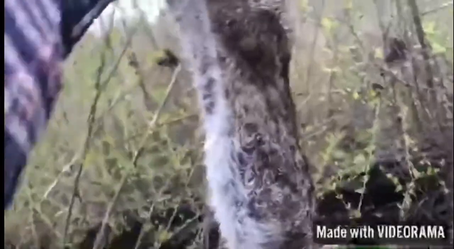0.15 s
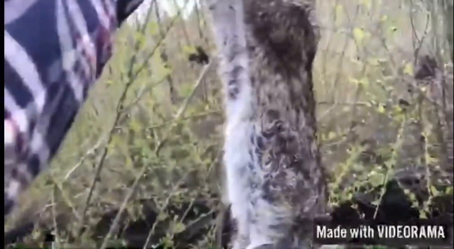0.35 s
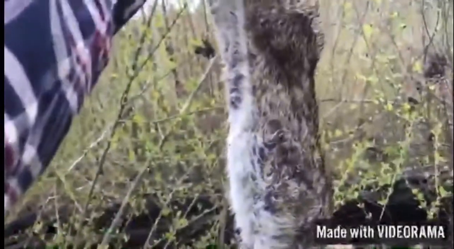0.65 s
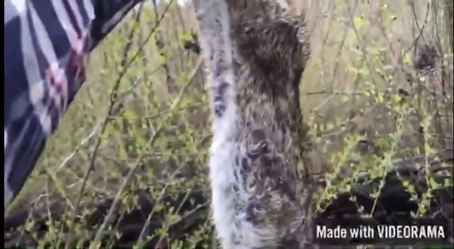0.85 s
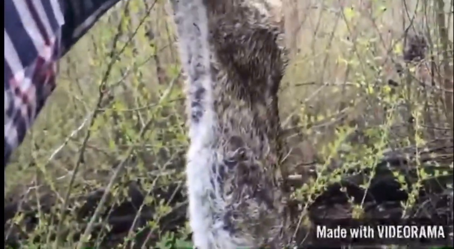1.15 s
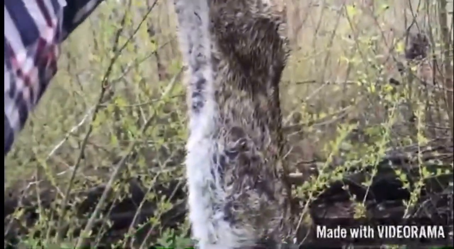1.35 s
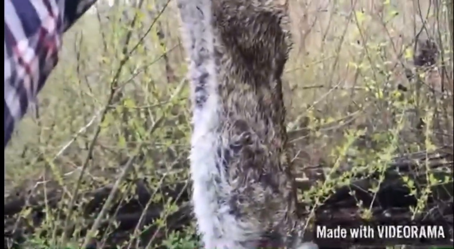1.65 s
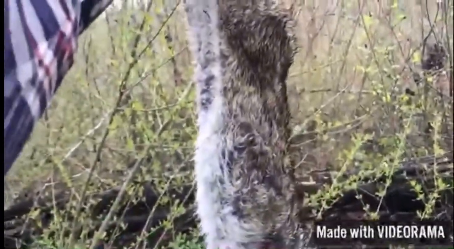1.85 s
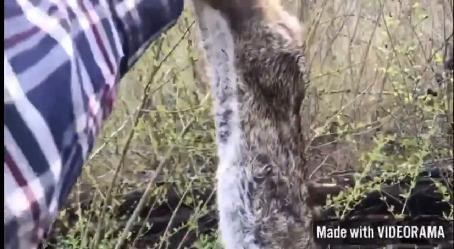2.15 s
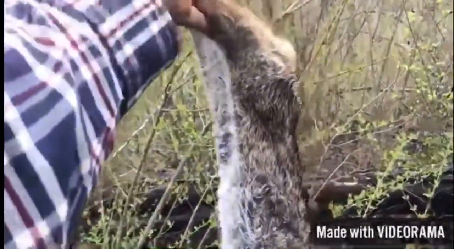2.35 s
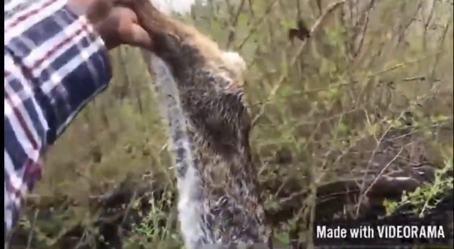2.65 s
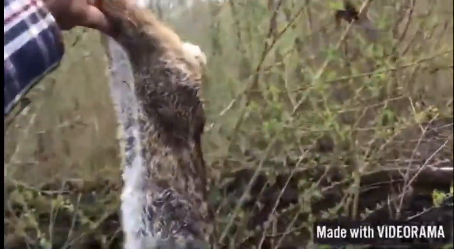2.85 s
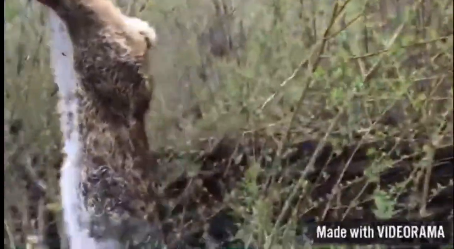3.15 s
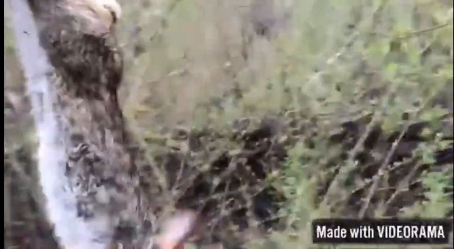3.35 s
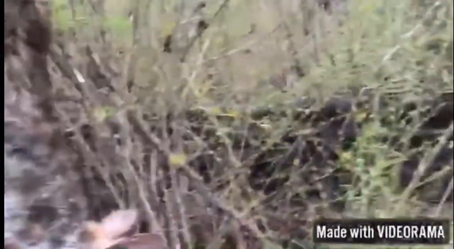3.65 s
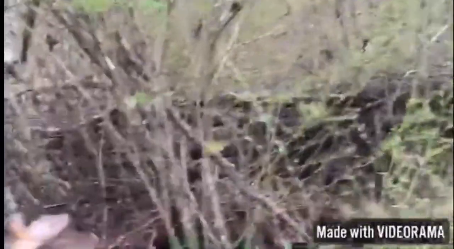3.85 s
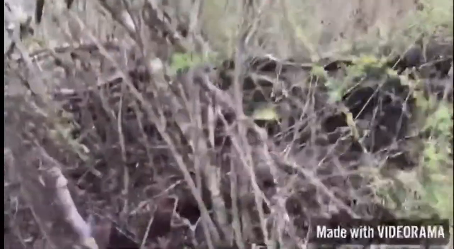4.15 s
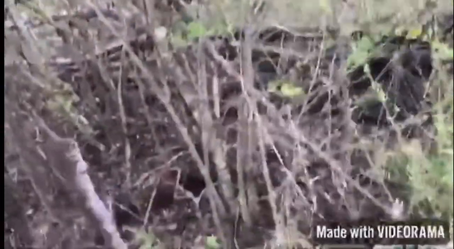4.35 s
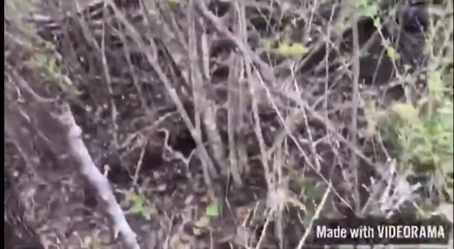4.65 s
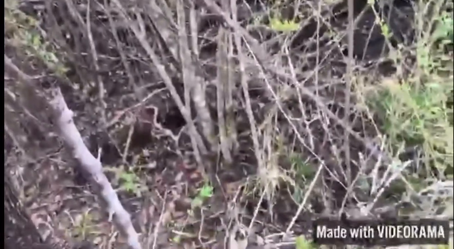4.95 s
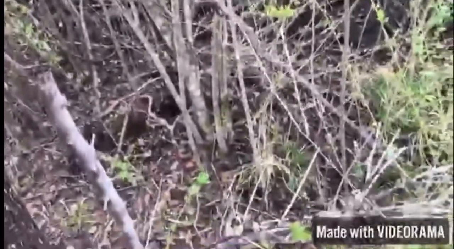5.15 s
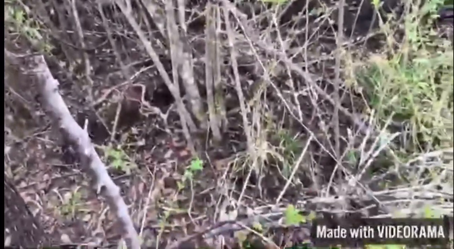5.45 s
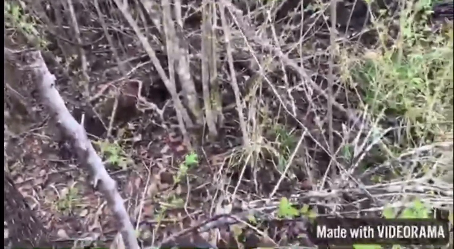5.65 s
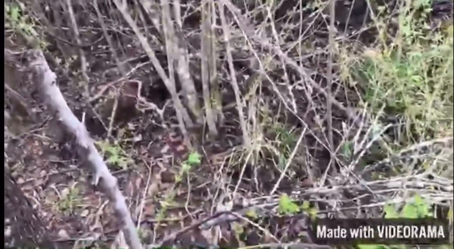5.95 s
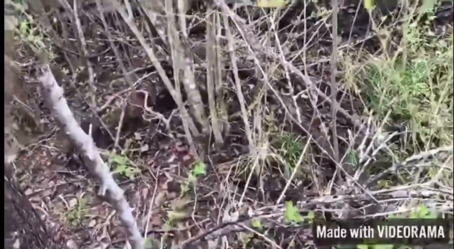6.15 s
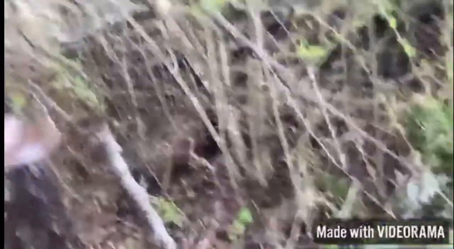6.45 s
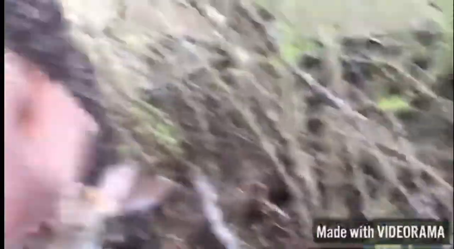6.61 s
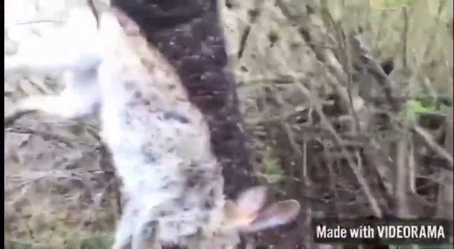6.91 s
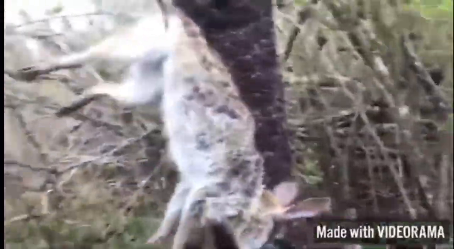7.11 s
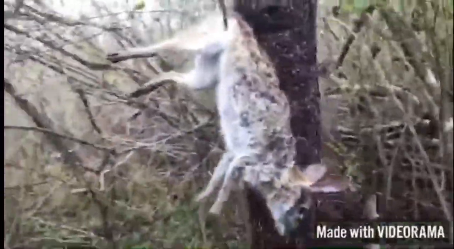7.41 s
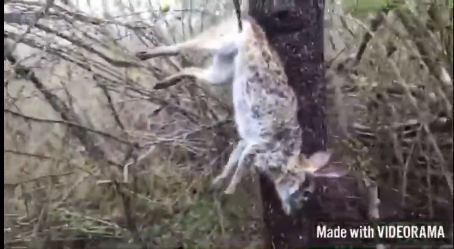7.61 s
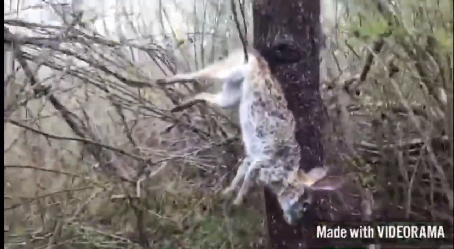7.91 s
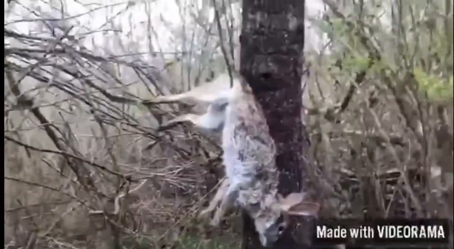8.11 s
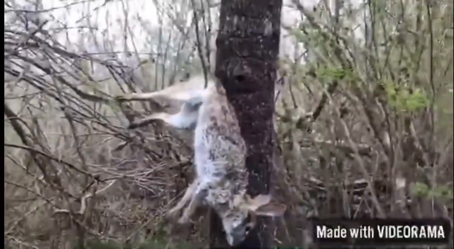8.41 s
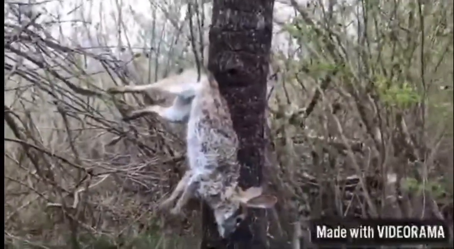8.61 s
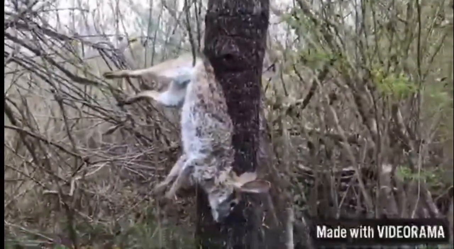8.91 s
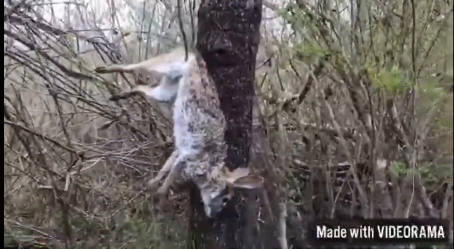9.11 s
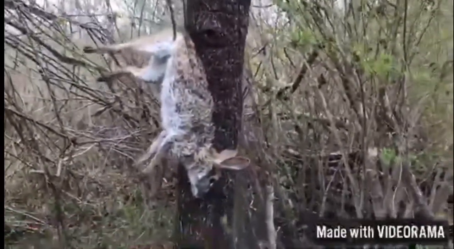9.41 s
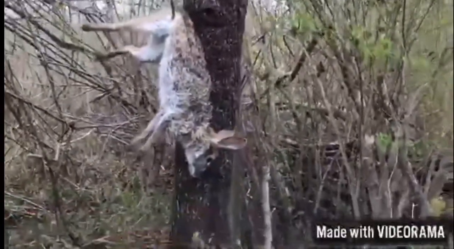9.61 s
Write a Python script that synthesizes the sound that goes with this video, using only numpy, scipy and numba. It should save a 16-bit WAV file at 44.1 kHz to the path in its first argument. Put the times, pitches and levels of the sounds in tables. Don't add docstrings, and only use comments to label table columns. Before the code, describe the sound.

Several dogs mill about in dry brush near a handheld phone. Thin, high nose whistles and brief throaty yelps come in irregular bursts, mixed with low grunts and breathy panting. Twigs snap sharply throughout, some with a dull wooden knock. Leaves rustle continuously over a faint, distant low engine hum, and the hand softly rubs the phone case. Outdoors, dry, with only a slight scatter from the stems.

```python
import sys
import numpy as np
from scipy import signal
from scipy.io import wavfile
from scipy.ndimage import uniform_filter1d
from numba import njit

SR = 44100
rng = np.random.default_rng(int(sys.argv[2]) if len(sys.argv) > 2 else 0)


def natural_amplitude(level_db):
    exponent = np.asarray(level_db, float) / 20
    return 10 ** exponent


def store_pcm(level_fs):
    pcm = np.round(np.clip(level_fs, -1, 1) * 32767).astype(np.int16)
    wavfile.write(sys.argv[1], SR, np.atleast_2d(pcm).T)


N = 430857
T = np.arange(N) / SR


def unit(x):
    return x / np.sqrt(np.mean(x ** 2))


@njit
def svf(x, hz, width):
    y, b, l = np.empty(len(x)), 0., 0.
    for i in range(len(x)):
        g, k = np.tan(np.pi * hz[i] / SR), width / hz[i]
        v = (b + g * (x[i] - l)) / (1 + g * (g + k))
        b, l, y[i] = 2 * v - b, l + 2 * g * v, k * v
    return y


def band(x, hz, width):
    centre = np.clip(hz + np.zeros(len(x)), 20., 9000.)
    return svf(x, centre, max(1. * width, 5.))


def walk(rate):
    hold = int(SR / rate)
    steps = np.repeat(rng.standard_normal(N // hold + 1), hold)
    slewed = uniform_filter1d(uniform_filter1d(steps, hold), hold)
    return unit(slewed[:N])


def arch(start, rise, fall, rise_db, fall_db):
    u = np.linspace(-1, 1, num=13)
    times = start + rise + u * np.where(u < 0, rise, fall)
    return times, -u ** 2 * np.where(u < 0, rise_db, fall_db)


def read(call, fade_s):
    s, *columns = np.transpose(call)
    span = slice(int(s[0] * SR), int(s[-1] * SR))
    t = T[span]
    to_edge = np.minimum(t - s[0], s[-1] - t)
    gate = np.sin(np.pi / 2 * np.clip(to_edge / fade_s, 0, 1))
    return span, [np.interp(t, s, c) for c in columns], gate


def stroke(row, peak, above_db, rise_db, fall_db, first=1, throat_db=0):
    effort, throat_hz = 0.068, 1050
    start, length, hz_in, hz_out, db = row
    peak = np.clip(peak, .02, .98)
    s, sag_db = arch(start, peak * length, (1 - peak) * length, rise_db, fall_db)
    hz = hz_in + (hz_out - hz_in) * (s - start) / length
    levels = []
    for k, harmonic_db in enumerate(above_db):
        lift_db = -throat_db * np.log2((first + k) * hz / throat_hz) ** 2
        lift_db = lift_db - lift_db[len(lift_db) // 2]
        levels.append(db + harmonic_db + sag_db * (1 + effort * k) + lift_db)
    return np.transpose([s, hz, *levels])


def voice(calls, rough, first, jitter, shimmer_db, fade_s, tilt_db=0, nose_db=np.zeros(99), count=0):
    out, waver, flutter, uneven = np.zeros(N), walk(150), walk(90), walk(700)
    for call, hoarse, nasal_db in zip(calls, rough, nose_db):
        span, (hz, *levels), gate = read(call, fade_s)
        for k in range(1, count + 1):
            off = ((first + 2 + k) * hz - 4700) / 700
            nasal = np.minimum(*levels[:2]) + nasal_db - 9 * off ** 2
            levels.append(np.maximum(levels[2] - tilt_db * k, nasal))
        phase = 2 * np.pi * np.cumsum(hz * (1 + jitter * waver[span])) / SR
        tone = sum(natural_amplitude(db) * np.sin((first + k) * phase + k * k) for k, db in enumerate(levels))
        shimmer = natural_amplitude(shimmer_db * np.minimum(flutter[span], .5))
        out[span] += np.sqrt(2) * gate * shimmer * (1 + hoarse * uneven[span]) * tone
    return out


def thicket():
    # frequency in Hz, level in dB per Hz
    wood = [(15, -38), (25, -14.5), (53, 3), (75, -2), (217, -9), (511, -6.5), (795, -12.5), (1270, -13),
            (4220, -19), (8180, -20.5), (8800, -29), (11400, -65.5), (19400, -120)]
    # time in seconds, level in dB
    stir = [(0.0, -53.5), (0.49, -55), (0.68, -48), (1.17, -51.5), (1.309, -61), (1.499, -51.5),
            (2.42, -53.5), (2.75, -55.5), (3.92, -49.5), (5.3, -58), (5.74, -55.5), (6.37, -50),
            (6.77, -53.5), (7.35, -48.5), (7.92, -53.5), (8.6, -53), (8.73, -56), (9.77, -57)]
    # middle in seconds, half length in seconds, level in dB
    lulls = [
        (1.073, 0.065, -5),
        (1.83, 0.098, -2.5),
        (4.65, 0.13, 0),
        (8.81, 0.095, -0.5),
        (6.82, 0.036, -2),
    ]
    hz, db = np.transpose(wood)
    s, stir_db = np.transpose(stir)
    stir_db = np.interp(T, s, stir_db - stir_db.mean())
    stir_db = stir_db + sum(lull_db * np.exp(-((T - mid) / half) ** 4) for mid, half, lull_db in lulls)
    ticks = (rng.random(N) < 120 / SR) * natural_amplitude(np.minimum(3.3 * rng.exponential(size=N), 11))
    bed, patch = 0, walk(7)
    for f in 30 * 2 ** np.arange(0, 8.6, 1 / 3):
        patch = .7 * patch + .71 * walk(7)
        bed_db = np.interp(np.log(f), np.log(hz), db) + min(f / 700, 1) * stir_db
        bed_db = bed_db + 2.6 * patch + 1.9 * walk(30)
        bed = bed + natural_amplitude(bed_db) * band(rng.standard_normal(N), f, f / 4.06)
    leaves = unit(bed) * natural_amplitude(-50.5)
    leaves = leaves - 0.6 * band(leaves, 4900, 300)
    ticking = band(band(ticks, 3500 * 2 ** (.5 * walk(40)), 2500), 3500, 7700)
    return leaves + natural_amplitude(stir_db - 34.5) * ticking


def drone():
    # time in seconds, pitch in Hz, level in dB
    engine = [(0.0, 62.5, -64), (0.3, 57, -62), (0.811, 55.4, -64), (1.2, 76.8, -64), (4.49, 73.8, -58.5),
              (4.65, 56.7, -64), (4.92, 70.9, -68), (5.03, 59.4, -61), (5.22, 60, -58), (5.44, 74, -59),
              (6.37, 73.1, -53.5), (6.56, 92, -57), (7.05, 61, -80), (7.16, 70.8, -58.5), (9.44, 73.8, -58),
              (9.58, 75, -70), (9.69, 55.8, -69), (9.77, 56.2, -72)]
    s, hz, db = np.transpose(engine)
    hz = np.interp(T, s, hz) * (1 + .02 * walk(12))
    note = np.sqrt(2) * np.sin(2 * np.pi * np.cumsum(hz) / SR) * natural_amplitude(1.6 * walk(11.0))
    return note * natural_amplitude(np.interp(T, s, db))


def nose_whistles():
    # start in seconds, length in seconds, pitch in and pitch out in Hz, level in dB.
    pure = [
        (0.177, 0.027, 4920, 3800, -54),
        (0.202, 0.049, 3700, 4300, -60),
        (0.761, 0.048, 5070, 4900, -49.5),
        (0.792, 0.057, 4750, 4430, -46),
        (2.08, 0.086, 4150, 4100, -52),
        (5.961, 0.015, 3770, 3700, -29),
        (8.099, 0.045, 4740, 4660, -49),
        (8.633, 0.055, 4230, 4350, -36),
    ]
    squeaks = [(0.0, 0.1, 8140, 8390, -60.5), (1.107, 0.077, 8600, 8380, -54.5),
               (1.165, .03, 8500, 7450, -61), (1.558, 0.033, 7900, 5700, -52),
               (2.127, 0.043, 7400, 6700, -45), (2.103, 0.078, 8200, 8360, -42.5),
               (2.169, 0.052, 9060, 7500, -40.5), (4.866, 0.023, 8600, 8200, -52),
               (5.955, 0.023, 8430, 7250, -41.5), (5.97, 0.039, 7170, 7040, -44),
               (6.854, 0.017, 4110, 3930, -42), (6.962, 0.024, 7150, 7200, -42),
               (7.44, .024, 7100, 7000, -43), (8.645, 0.028, 8600, 8560, -39)]
    # start in seconds, length in seconds, pitch in and pitch out in Hz, level in dB
    faint = [
        (0.15, 0.12, 1430, 1344, -58),
        (2.094, 0.087, 1365, 1523, -49),
        (2.439, 0.067, 1200, 2000, -58),
        (2.504, 0.04, 2045, 1810, -47),
        (5.325, 0.063, 1096, 792, -52.5),
               (.005, 0.073, 4000, 4170, -65), (.09, 0.057, 3900, 3450, -65),
             (0.63, 0.049, 7200, 7340, -53.5), (0.54, 0.082, 6050, 6000, -58), (2.02, .04, 5100, 5100, -57),
             (5.33, .045, 8600, 7800, -60), (2.325, .045, 3900, 4250, -57), (3.122, .025, 3250, 3200, -52),
             (3.085, .025, 4100, 3800, -60), (5.385, 0.037, 3400, 3300, -62),
             (1.155, 0.029, 1070, 1120, -51), (5.875, 0.021, 1075, 1130, -50),
             (6.93, 0.088, 4300, 4550, -57), (7.425, .02, 2800, 4500, -54), (6.38, 0.062, 390, 576, -48),
             (5.41, .02, 6810, 6790, -57), (1.604, .02, 8650, 7950, -53), (1.643, .017, 6720, 6660, -49)]
    # time in seconds, pitch in Hz, level in dB
    winding = [
        [(8.51, 8650, -42), (8.525, 8080, -32), (8.545, 7200, -46), (8.565, 6830, -43), (8.593, 6860, -47)],
        [(4.895, 3900, -63), (4.93, 3450, -61), (4.975, 3900, -64)],
        [(4.7, 5250, -64), (4.73, 5100, -60), (4.77, 5040, -57), (4.79, 4940, -62)],
        [(4.81, 4800, -61), (4.86, 4700, -59), (4.89, 4200, -61)],
        [(4.97, 3920, -73), (5.01, 4350, -55), (5.04, 4550, -56), (5.065, 4430, -63)],
        [(5.07, 4050, -57), (5.095, 3700, -55.5), (5.125, 3750, -66)],
        [(4.898, 7400, -54), (4.925, 6900, -56), (4.95, 7240, -51), (4.99, 8270, -62)],
        [(6.862, 4250, -45), (6.88, 4430, -40), (6.897, 4250, -39), (6.915, 4120, -45), (6.93, 3800, -39)],
        [(6.856, 8100, -50), (6.875, 8650, -52), (6.897, 8600, -42), (6.916, 8150, -47), (6.93, 7100, -54)],
        [(5.265, 4490, -52), (5.3, 4560, -49.5), (5.33, 4350, -51), (5.36, 3990, -42.5), (5.41, 3490, -66)],
    ]
    strokes = [stroke(row, .4, [0], rise_db=7, fall_db=10) for row in pure + squeaks + faint]
    return voice(strokes + winding, np.full(99, .32), first=1, jitter=.008, shimmer_db=5, fade_s=.005)


def twigs():
    # time in seconds, crack in dB, knock
    # above the crack in dB, knock pitch in Hz
    knocking_twigs = [(.018, -50, 15.5, 780), (.8752, -26.5, -9, 1290), (.952, -49.5, 19, 760),
                      (1.2996, -26, -5, 1730), (2.3985, -36, -4, 584), (2.4264, -33, -7, 842),
                      (3.3884, -23, -16, 2100), (3.4179, -40.5, 6.5, 2000), (3.7903, -32.5, 6.5, 704),
                      (4.4411, -47.5, 19, 1470), (4.7726, -54, 16.5, 2230), (4.8942, -34, -11, 520),
                      (6.2089, -29, -7, 685), (7.3987, -28, -6, 736), (7.5788, -29.5, -17, 670),
                      (9.1217, -36, 4, 900), (9.2441, -42, 16.5, 1305), (9.2845, -28.5, -14, 1130),
                      (9.4668, -25, -8.5, 1540), (9.6234, -34, -8, 1330), (9.7098, -32, -4, 1990),
                      (9.327, -35.5, -3, 5500), (5.762, -46, -1, 3500), (5.912, -40, 3.5, 2500),
              (5.966, -36, -3, 3700), (0.365, -55, -11, 5000), (0.5015, -43.5, 2.5, 3630),
              (.685, -49, 14, 790), (1.5021, -41, -14, 1420), (4.0998, -47, 5, 2600),
              (4.421, -39, 2.5, 2000), (4.676, -44, 5, 2360), (5.193, -47.5, -5, 6000),
              (6.095, -42.5, 0, 3500), (6.2805, -43.5, 5, 2395), (6.6167, -38.5, -3, 1545),
              (6.78, -46.5, 3.5, 2630), (7.7402, -38.5, -6.5, 2750), (8.1582, -38, 2, 1330),
              (.902, -44, 7, 4500), (3.258, -40, -2, 3600), (3.322, -36, -13, 3000),
              (8.232, -38, -14, 4000), (2.89, -46.5, -5, 4503), (9.087, -48, 5, 2020),
              (9.349, -49.5, 5, 1500), (9.412, -58.5, 12, 1195), (9.4449, -38, -8, 3004)]
    # time in
    # seconds, crack in dB
    further_snaps = [(0.1443, -35.5), (2.936, -34), (4.2643, -33.5), (2.156, -17), (2.814, -25), (3.067, -22.5),
                     (4.2203, -23), (7.0266, -26), (8.1966, -16.5), (8.917, -35), (9.456, -27.5), (9.67, -25)]
    out, t = np.zeros(N + 4096), T[:4096]
    breaks = knocking_twigs + [(s, db, -25, 1000) for s, db in further_snaps]
    chance = rng.standard_normal((len(breaks), 4096))
    for (s, db, knock_db, hz), noise in zip(breaks, chance):
        burst = np.minimum(t / .0008, 1) * (np.exp(-t / .0013) + .25 * np.exp(-t / .011))
        crack = band(noise * burst, 3620, 6000)
        knock = band(band(noise * np.exp(-t / 0.004), hz, 0.5 * hz), hz, 1.2 * hz)
        i = int(s * SR)
        out[i:i + 4096] += natural_amplitude(db) * (crack / abs(crack).max() + natural_amplitude(knock_db) * knock / abs(knock).max())
    return out[:N]


def grip():
    # start, rise and fall in seconds, level in dB
    shifts = [(.18, 0.033, 0.17, -46.5), (1.2, 0.081, 0.084, -46), (1.6, 0.065, 0.074, -42.5),
              (2.201, 0.051, 0.29, -47.5), (4.38, 0.064, 0.088, -48.5), (6.925, 0.017, 0.035, -38),
              (7.44, 0.022, 0.022, -38), (4.78, 0.026, 0.095, -47.5), (5.55, 0.092, 0.071, -51.5),
              (8.95, 0.093, 0.19, -50.5), (9.2, 0.071, .12, -41)]
    drags = [
        (8.915, 0.018, 0.12, -47),
        (9.05, 0.022, 0.029, -53),
        (9.115, 0.048, 0.058, -47.5),
        (9.23, 0.012, 0.057, -48),
    ]
    out, rub = np.zeros(N), rng.standard_normal(N) * natural_amplitude(2.2 * walk(35))
    upper = band(band(rub, 301, 120), 301, 120)
    both = unit(band(rub, 144, 66) + 0.34 * upper)
    for moves, ring in ((shifts, both), (drags, unit(upper))):
        for start, rise, fall, db in moves:
            shape = arch(start, rise, fall, rise_db=28.5, fall_db=20)
            span, (sag_db,), gate = read(np.transpose(shape), 0.015)
            out[span] += gate * natural_amplitude(db + sag_db) * ring[span]
    return out


def yelps():
    # start in seconds, length in seconds, pitch in and pitch out in Hz, level in dB
    cries = [(0.284, 0.011, 1180, 1160, -41.5), (0.439, 0.044, 655, 588, -27),
             (0.485, 0.074, 1327, 1180, -41), (0.56, 0.055, 1130, 988, -33.5),
             (1.578, 0.013, 546, 624, -34), (1.593, 0.022, 587, 556, -29.5),
             (1.945, 0.057, 473, 607, -25.5), (2.259, 0.065, 607, 450, -40), (3, 0.053, 560, 626, -32.5),
             (3.875, 0.026, 385, 380, -41.5), (5.398, 0.043, 762, 930, -41.5),
             (5.924, 0.031, 406, 440, -32.5), (6.359, 0.032, 517, 491, -53.5),
             (6.438, 0.091, 911, 898, -31.5), (6.904, 0.026, 636, 580, -42),
             (7.286, 0.053, 438.5, 529, -38), (7.33, 0.074, 747, 775, -34), (7.407, 0.036, 739, 724, -36.5)]
    # loudest at share of length 0-1, second and third harmonic
    # above the first in dB
    manner = [(0.4, -17, -36), (0.075, -17.5, -27.5), (0.97, -33, -21), (0.49, -9.5, -16), (0.21, -4, -25),
              (0.3, -1, -16), (0.63, 5, -5.5), (0.4, -26, -23), (0.4, -4, -23), (0.13, 1, 4.5),
              (0.33, -17, -28), (0.55, -5, -1), (0.19, 27, -14), (0.19, -13, -15.5), (0.57, -11, -21),
              (0.16, 4.5, 4), (0.12, -13, -11.5), (0.17, -23, -5)]
    hoarseness = [.3, .4, .06, .1, .4, .3, .33, .4, .22, .12, .6, .35, .2, .04, .25, .25, .08, .1]
    nasal = [-30, -20, -20, -9, -27, -21, -26.5, -30, -10.5, -20, -40, -26, -30, -22, -32, -33, -26, -24]
    calls = [stroke(row, peak, [0, second_db, third_db], rise_db=6, fall_db=11, throat_db=20.5)
             for row, (peak, second_db, third_db) in zip(cries, manner)]
    return voice(calls, hoarseness, first=1, jitter=0.016, shimmer_db=2.0, fade_s=0.0018,
                 tilt_db=6.5, nose_db=nasal, count=7)


def panting():
    # start, rise and fall in seconds, mouth level in dB, jaw above it in dB
    wide = [(1.215, 0.08, 0.039, -49.5, 2), (1.62, 0.079, 0.047, -55, 11.5), (1.917, 0.061, 0.03, -56, 15),
            (2.21, 0.011, 0.24, -57, -1), (2.42, 0.036, 0.075, -66, 15), (5.905, 0.1, 0.086, -47, 2.5),
            (6.93, 0.035, 0.062, -54.5, -7), (7.01, 0.016, 0.037, -49.5, -28),
            (7.189, 0.15, 0.017, -59.5, 9), (7.502, 0.075, .023, -58.5, 1), (8.62, 0.067, 0.084, -54.5, 2),
            (8.918, 0.046, 0.1, -61, 7)]
    toothy = [(.66, 0.096, 0.12, -63, 11), (3.93, 0.027, 0.071, -68, 14.5),
              (4.24, 0.035, 0.055, -68.5, 16.5), (5.35, 0.064, 0.079, -61.5, -5),
              (5.604, 0.052, 0.082, -54, 6), (6.27, 0.097, 0.022, -57.5, 3), (7.44, 0.013, 0.029, -54, -5),
              (7.78, 0.029, 0.12, -68, 13), (8.078, 0.025, 0.21, -59, 4.5), (9.215, 0.047, 0.088, -56, 2),
              (9.442, 0.088, 0.048, -70, 13), (9.62, 0.049, 0.063, -61.5, 4)]
    # frequency in Hz, width in Hz, level in dB
    formants = [(2000, 300, -6), (2560, 330, 0), (3550, 420, 0), (4300, 450, -5), (3000, 2600, -4)]
    gape = [(0, .05), (-.25, 0.068), (-.15, 0.048), (-.05, .05), (-.05, 0.03), (-.05, 0.082), (-.05, .05),
            (-.05, .05), (-.05, 0.065), (-.07, -0.0058), (-.05, 0.041), (-.05, 0.056), (-.05, 0.075),
            (.05, .1), (-.1, -0.018), (-.05, 0.039), (-.1, -.05), (-.05, .05), (-.05, 0.14), (-.05, 0.035),
            (-.05, 0.043), (-.05, 0.14), (-.05, 0.042), (-.05, -0.035)]
    air = rng.standard_normal(N) * natural_amplitude(2 * walk(300))
    ends = np.array([(start, start + rise + fall) for start, rise, fall, *_ in sorted(wide + toothy)])
    drift = 2 ** np.interp(T, ends.ravel(), np.ravel(gape)) + 0.063 * walk(14)
    jaw = unit(band(air, 1460 * drift, 200) + .3 * band(band(air, 1200, 900), 1200, 900))
    mouth = 0
    for hz, width, db in formants:
        ring = band(band(air, hz * drift, .75 * width), hz * drift, 2.2 * width)
        mouth = mouth + natural_amplitude(db + 3.5 * walk(35)) * ring
    mouth = unit(mouth)
    teeth = unit(natural_amplitude(3 * walk(30)) * band(band(air, 6600, 4000), 6600, 4000))
    out = np.zeros(N)
    for puffs, teeth_db in ((wide, -32.5), (toothy, -6.5)):
        for start, rise, fall, db, jaw_db in puffs:
            span = slice(int(start * SR), int((start + rise + fall) * SR))
            angle = np.interp(T[span] - start, [0, rise, rise + fall], [0, np.pi / 2, np.pi])
            puff = abs(np.sin(angle)) ** 0.93
            breath = mouth + natural_amplitude(jaw_db - 5.5) * jaw + natural_amplitude(teeth_db + 4.5) * teeth
            out[span] += puff * natural_amplitude(db + 9.5) * breath[span]
    return out


def grunts():
    # start, rise and fall in seconds, level in dB, resonance in Hz
    rattles = [(0.671, 0.024, 0.1, -35.5, 606), (1.189, 0.012, 0.061, -40.5, 530),
               (1.25, 0.033, 0.014, -38.5, 584), (1.48, 0.067, 0.054, -48.5, 660),
               (1.62, 0.038, 0.016, -41, 650), (2.22, 0.049, 0.093, -45, 570), (5.6, 0.08, 0.038, -48, 650),
               (6.929, 0.039, 0.039, -46.5, 550), (6.999, 0.052, 0.022, -43.5, 930),
               (7.452, 0.0079, 0.01, -35.5, 537), (9.504, 0.019, 0.037, -50.5, 1000),
               (9.72, 0.015, 0.036, -49, 1420), (3.51, 0.057, 0.093, -55, 1050),
               (3.68, 0.022, 0.032, -57, 1400), (.72, 0.014, 0.068, -49, 1050)]
    out = np.zeros(N)
    flaps = rng.standard_normal(N) * natural_amplitude(5.3 * walk(90))
    for start, rise, fall, db, hz in rattles:
        shape = arch(start, rise, fall, rise_db=6.5, fall_db=16.5)
        span, (sag_db,), gate = read(np.transpose(shape), 0.004)
        flap = flaps[span]
        ring = band(flap, hz, 160) + 0.38 * band(flap, hz * 0.84, 560) + 0.096 * band(flap, hz / 2, 220)
        out[span] += gate * natural_amplitude(db + 2.0 + sag_db) * unit(band(ring, hz, 4.0 * hz))
    return out


def steady_whines():
    # time in seconds, pitch in Hz, level in dB
    bends = [
        [(1.0, 4800, -62), (1.01, 4730, -49), (1.026, 4840, -56), (1.104, 4930, -41), (1.134, 5011, -43),
         (1.15, 5127, -36), (1.212, 5150, -37.5), (1.262, 5680, -44), (1.285, 5379, -53)],
        [(1.095, 4340, -67), (1.105, 4400, -51), (1.113, 4500, -43), (1.133, 4400, -42), (1.19, 4180, -53)],
        [(1.752, 4258, -58), (1.76, 4380, -48.5), (1.784, 4350, -40.5), (1.804, 4330, -56.5),
         (1.878, 4660, -43), (1.894, 4684, -76), (1.94, 4736, -57)],
        [(2.58, 4880, -76), (2.596, 4840, -50), (2.676, 4900, -65), (2.732, 5120, -48), (2.794, 4800, -45.5),
         (2.806, 4800, -71), (2.815, 4992, -54)],
        [(8.385, 4549, -57), (8.399, 4540, -44.5), (8.427, 4560, -50), (8.481, 4600, -45), (8.511, 4276, -55),
         (8.553, 3500, -55), (8.587, 3430, -45), (8.6, 3400, -78)],
    ]
    return voice(bends, np.full(9, .18), first=1, jitter=.006, shimmer_db=3.5, fade_s=.005)


def ringing_breath():
    # start, rise and fall in seconds, level in dB, resonance at start and at end in Hz
    catches = [
        (7.012, .018, .045, -40, 2700, 2850),
        (1.665, .035, .03, -44, 3550, 3750),
        (1.25, .05, .04, -47, 3450, 3560),
        (8.63, .035, .06, -51, 1400, 1230),
        (1.645, .045, .025, -51, 2400, 2900),
    ]
    out, air = np.zeros(N), rng.standard_normal(N) * natural_amplitude(3 * walk(120))
    for start, rise, fall, db, hz_in, hz_out in catches:
        shape = arch(start, rise, fall, rise_db=9.9, fall_db=11)
        span, (sag_db,), gate = read(np.transpose(shape), .004)
        hz = np.linspace(hz_in, hz_out, len(gate))
        out[span] += gate * natural_amplitude(db + sag_db) * unit(band(band(air[span], hz, 260), hz, 500))
    return out


def creak():
    # start in seconds, length in seconds, pitch in and pitch out in Hz, level in dB
    bark = [
        (6.336, 0.038, 220.5, 194.4, -31.5),
    ]
    harmonics_db = [-11.5, -3, -5.5, 1.5, -7.5, -29, -31, -15.5, -24]
    call = stroke(bark[0], 0.3, harmonics_db, rise_db=1.3, fall_db=1.5)
    return voice([call], [.4], first=2, jitter=.008, shimmer_db=.8, fade_s=.003)


def scene():
    throats = yelps() + grunts() + creak()
    noses = nose_whistles() + steady_whines()
    near = throats + noses + panting() + ringing_breath() + twigs()
    stems = rng.standard_normal(8192) * np.exp(-T[:8192] / 0.063) * (T[:8192] > .005)
    echo = signal.fftconvolve(near, stems / np.sqrt(np.sum(stems ** 2)))[:N]
    return (near + natural_amplitude(-24) * echo + thicket() + drone() + grip())[None]


def band_limit(x):
    return signal.sosfilt(signal.butter(12, 9970, fs=SR, output="sos"), x)


def record(dry):
    cut = signal.sosfilt(signal.butter(2, 38, "high", fs=SR, output="sos"), dry)
    cut = signal.sosfilt(signal.ellip(8, .3, 33, 8620, fs=SR, output="sos"), cut)
    return band_limit(cut)


dry = scene()
out = record(dry)
store_pcm(out)
```